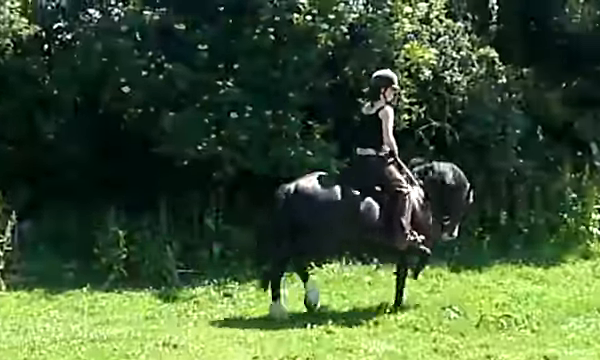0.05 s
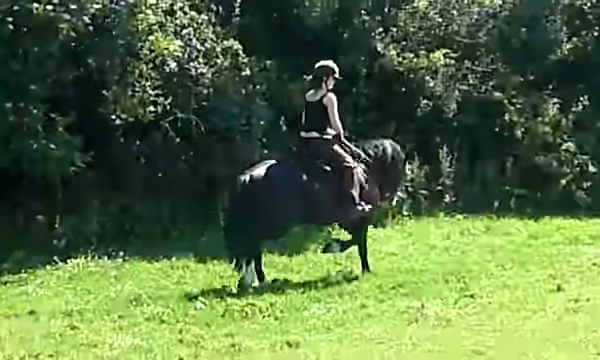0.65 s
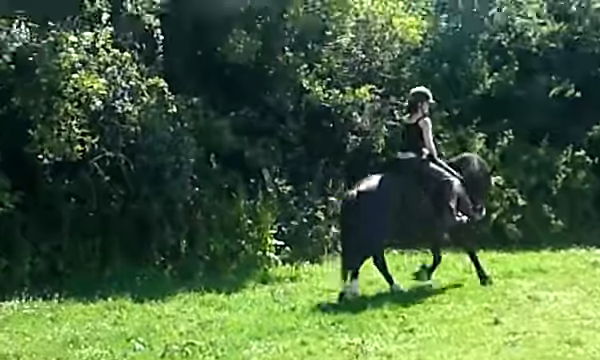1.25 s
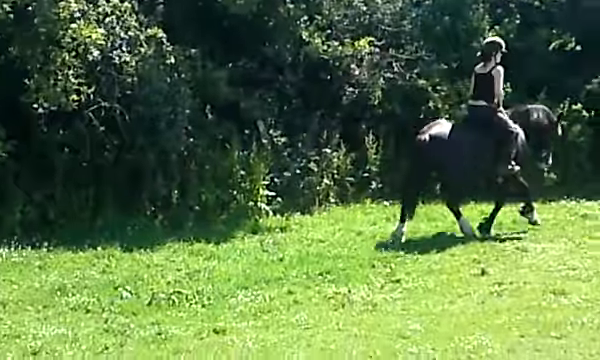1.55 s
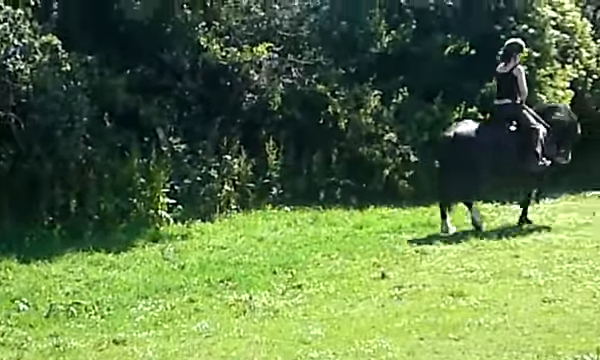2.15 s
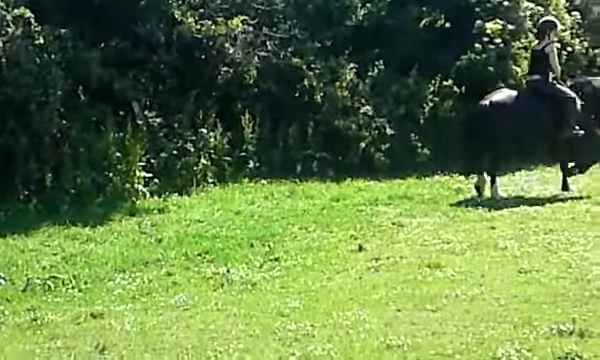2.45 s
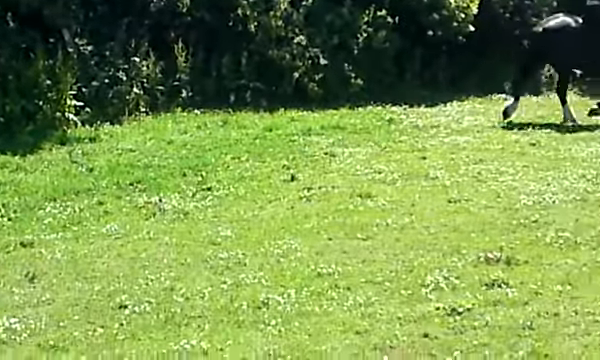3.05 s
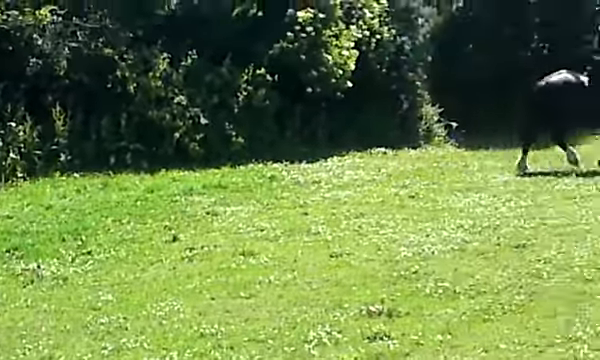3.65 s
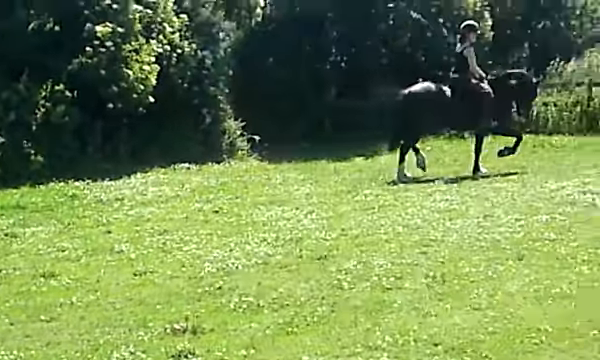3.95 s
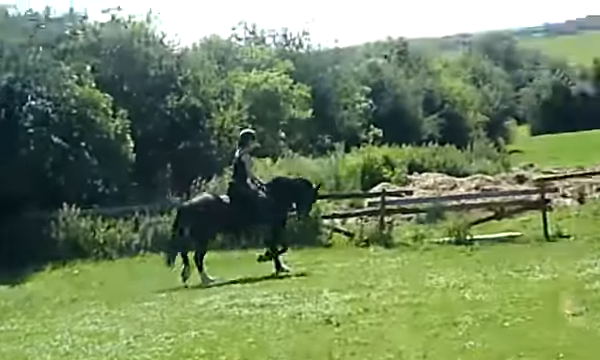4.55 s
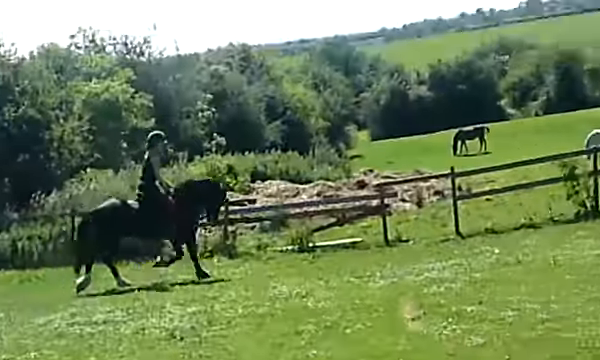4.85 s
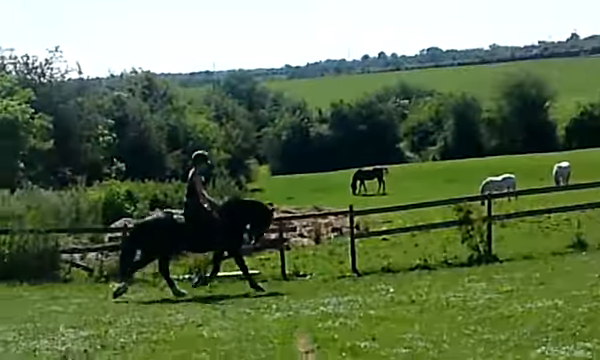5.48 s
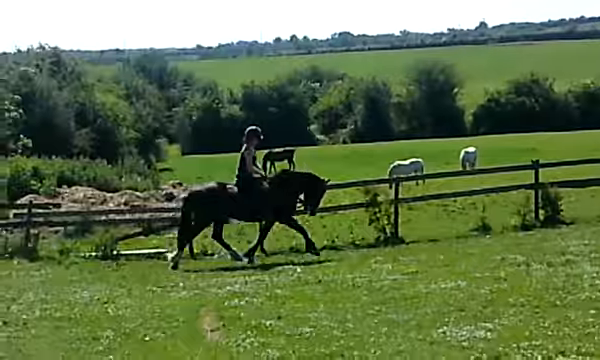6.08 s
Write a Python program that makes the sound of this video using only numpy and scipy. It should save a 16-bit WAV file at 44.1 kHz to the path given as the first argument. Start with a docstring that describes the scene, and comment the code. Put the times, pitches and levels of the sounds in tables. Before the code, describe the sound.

In a quiet open field, a horse trots some way off, its hooves thudding softly on turf while the tack clinks and it blows faintly. A loud cluster of clicks and scrapes from fingers on the camera comes early, right at the microphone. Small birds then trill and chirp in the hedge, and a second run of handling clicks follows. A soft breeze and a faint distant engine hum continue underneath.

```python
"""A breeze hisses in a quiet field, tack clinks, and a horse trots some way off, blowing softly.
Each hoof strikes soft turf, which damps the impact to a dull thud. Fingers shift on a camera and
excite the resonances of its case: it clicks, scrapes and rings, much louder than the field.
Small birds whistle in the hedge, scattered by the branches, over a distant engine's hum and faint
far-off whines. An insect buzzes once, early on; later a thin high hiss lingers after the birdsong."""
import sys
import numpy as np
from scipy import signal
from scipy.fft import rfft, irfft, next_fast_len
from scipy.io import wavfile
from scipy.ndimage import map_coordinates

SR = 44100
rng = np.random.default_rng(int(sys.argv[2]) if len(sys.argv) > 2 else 0)


def materialize(psi):
    """Save the field psi as 16-bit PCM at rate SR to the path in sys.argv[1].

    A 1-D psi becomes a single channel; in a 2-D psi each row is a channel.
    """
    bounded = np.clip(np.atleast_2d(psi).T, -1, 1)
    quanta = np.round(bounded * 32767).astype(np.int16)
    wavfile.write(sys.argv[1], SR, quanta)


N = 278712


def hoofs():
    """Damped impact: each hoof sets the turf briefly vibrating and crumbles the soil."""
    # hoof falls: t/s, level/dB
    steps = [(.286, -49), (.612, -60), (.955, -46.5), (1.311, -54), (1.655, -54), (1.972, -53),
             (2.361, -59), (2.72, -57), (3.085, -49.5), (3.47, -48), (3.815, -49.5), (4.463, -51),
             (4.664, -42), (4.949, -50), (5.882, -54), (6.217, -56)]
    turf_hz, pitch_spread, t60_s, soil_gain = 204, .1, .041, .75
    out, t = np.zeros(N), seconds(.25)
    soil = noise([(40, -7), (180, -1), (350, -4), (900, -20), (4000, -41)])  # f/Hz, level/dB
    for s, db in steps:
        hz = turf_hz * np.exp(pitch_spread * rng.standard_normal())
        crumble = np.roll(soil, -round(s * SR))[:len(t)]
        thud = .7 * np.sin(2 * np.pi * hz * t) + soil_gain * crumble
        add(out, s, amp(db) * struck(t, t60_s, rise_s=.00076) * thud)
    return out


def tack():
    """Free decay: clinking tack and swishing grass give bright noise that dies away exponentially."""
    # clinks and swishes: t/s, level/dB, T60/s, low cutoff f/Hz
    clinks = [(.224, -50, 0.38, 4530), (.395, -47, .07, 4000), (.527, -40.5, .08, 4550),
              (.591, -45.5, 0.21, 4500), (.76, -47.5, .27, 4500), (1.07, -46, .057, 5000),
              (1.26, -34.5, .025, 5030), (1.895, -41.5, .05, 6550), (3.255, -40, 0.033, 2800),
              (3.308, -46.5, 0.075, 4000), (3.478, -51, .018, 5000)]
    # spectrum of the jingle: f/Hz, relative level/dB
    spectrum = [(1500, -10), (3500, 0.5), (5000, -7), (7000, 4), (8500, -4.5)]
    out, t, jingle = np.zeros(N), seconds(.25), noise(spectrum)
    for s, db, t60, low_hz in clinks:
        burst = np.roll(jingle, -round(s * SR))[:len(t)]
        shimmer = filtered(burst, lambda f: f ** 3 / (f ** 3 + low_hz ** 3))
        add(out, s, amp(db) * struck(t, t60, rise_s=.0006) * unit(shimmer))
    return out


def blowing():
    """Turbulent flow: puffs through the horse's nostrils are coloured by the airway's resonance."""
    # breaths: t/s, duration/s, level/dB, resonance f/Hz
    blows = [(1.744, 0.097, -57, 1230), (2.848, 0.098, -58.5, 1300), (3.94, .075, -65, 1894),
             (4.957, .11, -64.5, 1916)]
    out = np.zeros(N)
    for s, length, db, hz in blows:
        u = seconds(length) / length
        airway = lambda f: 1 / (1 + 1.9j * (f / hz - hz / (f + 1))) ** 2
        breath = unit(filtered(rng.standard_normal(len(u)), airway))
        add(out, s, amp(db) * arch(u) * breath)
    return out


def case_clicks():
    """Impulse response: sharp contacts chatter on the camera case, whose flexing shell pushes air."""
    # contacts: t/s, level/dB, low cutoff f/Hz, high cutoff f/Hz, relative level of the push/dB
    contacts = [(0.5927, -29, 400, 6560, -30), (1.4869, -18, 2550, 2200, -38),
                (1.489, -1.5, 500, 1900, -20.5), (1.5096, -4, 3000, 4200, -20),
                (1.5133, -0.2, 2600, 3300, -26), (1.5145, -6, 3200, 2700, -34),
                (1.524, -14, 1900, 3400, -31), (1.5253, -4, 4200, 2400, -30),
                (1.5443, -14.5, 4200, 2600, -34), (4.4349, -40.5, 2000, 5961, -35),
                (4.5071, -11, 7900, 14000, -29.5), (4.5714, -22.5, 600, 2730, -33),
                (4.6349, -12, 2800, 9000, -27), (4.6365, -13.5, 500, 1780, -34),
                (4.6418, -18.5, 1300, 2200, -40), (4.6435, -24, 600, 910, -32),
                (4.7199, -29, 2500, 1900, -7)]
    chatter_per_hz, chatter_t60_s = .00004, .0042  # harder, brighter contacts chatter more
    push_hz, push_decay_s = 120, .0019
    out, t = np.zeros(N), seconds(.04)
    push = np.exp(-t / push_decay_s) * np.cos(2 * np.pi * push_hz * t) * (1 - np.exp(-t / .0001))
    for s, db, low_hz, high_hz, push_db in contacts:
        chatter = chatter_per_hz * high_hz * rng.standard_normal(len(t)) * amp(-60 * t / chatter_t60_s)
        click = through_case((t == 0) + chatter, low_hz, high_hz)
        add(out, s, amp(db) * (click / np.abs(click).max() - amp(push_db) * push))
    return out


def case_rubs():
    """Stick-slip friction: sliding skin drives the case with tiny uneven slips that carry no bass."""
    # slides: t/s, duration/s, level/dB, low cutoff f/Hz, high cutoff f/Hz
    rubs = [(1.468, .077, -44.5, 1400, 4000), (1.49, .018, -32, 1000, 5500),
            (1.513, .02, -26.5, 1800, 3800), (1.534, .008, -37, 3000, 3000),
            (4.286, .076, -39.5, 1300, 2650), (4.622, 0.036, -45, 900, 2800)]
    grain_db, bass_cut_hz = 6.5, 310
    out = np.zeros(N)
    for s, length, db, low_hz, high_hz in rubs:
        u = seconds(length) / length
        slips = rng.standard_normal(len(u)) * amp(grain_db * rng.standard_normal(len(u)))
        force = filtered(slips, lambda f: f ** 4 / (f ** 4 + bass_cut_hz ** 4))
        add(out, s, amp(db) * arch(u, .55) * unit(through_case(force, low_hz, high_hz)))
    return out


def case_rings():
    """Free vibration: small parts of the camera ring on after a click as damped sinusoids."""
    # ringing parts: t/s, f/Hz, level/dB, T60/s
    rings = [(.5928, 990, -37, 0.017), (1.5127, 1570, -13, .022), (1.5446, 3000, -24, 0.013),
             (4.5068, 3090, -29, .016), (4.636, 634, -46.5, 0.54), (4.6419, 2440, -29, 0.015),
             (4.7199, 764.6, -13, 0.012)]
    out, t = np.zeros(N), seconds(.5)
    for s, hz, db, t60 in rings:
        add(out, s, amp(db) * struck(t, t60, rise_s=.00067) * np.sin(2 * np.pi * hz * t))
    return out


def through_case(force, low_hz, high_hz):
    """Modal superposition: a force drives the case; soft contacts lose treble, small ones lose bass."""
    # modes of the plastic case: f/Hz, bandwidth/Hz, level/dB
    modes = [(190, 236, -2), (764, 410, 0.5), (1500, 620, -2), (2340, 620, -2.5), (3000, 485, -1),
             (4100, 1440, -6.5), (6250, 2000, -5.5), (7700, 1100, -2.5)]

    def response(f):
        body = sum((-1) ** k * amp(db) * 1j * f * width / (hz * hz - f * f + 1j * f * width)
                   for k, (hz, width, db) in enumerate(modes))
        high_pass = 1j * f / (low_hz + 1j * f)
        low_pass = 1 / (1 + 1j * np.sqrt(2) * f / high_hz - (f / high_hz) ** 2)
        return body * high_pass * low_pass
    return filtered(force, response)


def birds():
    """Direct and scattered sound: the song arrives both straight and by way of the trees."""
    # gliding chirps: t/s, duration/s, start f/Hz, end f/Hz, level/dB
    chirps = [(0.747, 0.038, 5000, 4200, -61), (1.825, .055, 5100, 4230, -59),
              (3.387, .099, 6190, 5440, -57), (4.306, 0.039, 7700, 5910, -49.5),
              (4.427, .02, 3800, 4500, -55), (4.429, 0.054, 3400, 2850, -56.5),
              (4.483, .026, 5590, 6900, -49), (4.76, 0.032, 4400, 3650, -56.5),
              (4.795, 0.034, 3380, 3060, -55.5), (4.827, .046, 5040, 3970, -51.5),
              (5.913, 0.052, 3200, 2860, -63), (6.175, .036, 4450, 3650, -58.5),
              (6.207, .038, 3440, 3090, -60)]
    # held whistles: t/s, duration/s, f/Hz, level/dB
    whistles = [(2.096, .077, 6900, -62.5), (4.348, 0.043, 6910, -55.5), (4.493, 0.1, 6820, -48),
                (4.76, 0.076, 5180, -51), (5.52, .048, 5860, -54), (5.55, .065, 6180, -58.5),
                (5.625, .09, 4100, -56), (6.24, 0.053, 4430, -62.5)]
    pitch_sag, scatter_db = .014, -5
    song = trill(count=7) + forked_calls(count=3)
    for s, length, start_hz, end_hz, db in chirps:
        add(song, s, amp(db) * chirp(length, start_hz, end_hz))
    for s, length, hz, db in whistles:
        add(song, s, amp(db) * whistle(length, hz, hz, (1 - pitch_sag) * hz))
    return .8 * song + amp(scatter_db) * trees(song)


def trill(count):
    """Periodic repetition: falling sweeps grow louder, each opened by a soft, short note."""
    # one sweep: duration/s, start f/Hz, middle f/Hz, end f/Hz
    glide = (.046, 6000, 4600, 3800)
    start_s, period_s, first_db, growth_db = 3.525, .1128, -57, 1.16
    opening_lead_s, opening_db = .02, -13
    out = np.zeros(N)
    for k in range(count):
        s, db = start_s + k * period_s, first_db + k * growth_db
        sweep = whistle(*glide)
        swell = np.minimum(1, np.linspace(.3, 2, len(sweep)))
        add(out, s, amp(db) * swell * sweep)
        add(out, s - opening_lead_s, amp(db + opening_db) * whistle(.031, 5650, 5750, 5650))
    return out


def forked_calls(count):
    """Biphonation: in each thin, high call one voice falls while the other rises."""
    # the two voices: start f/Hz, middle f/Hz, end f/Hz, level/dB
    voices = [(7960, 7720, 7350, -65.5), (8080, 8260, 8490, -69.5)]
    start_s, period_s, length_s = 2.645, .22, .088
    out = np.zeros(N)
    for k in range(count):
        for start_hz, middle_hz, end_hz, db in voices:
            add(out, start_s + k * period_s, amp(db) * whistle(length_s, start_hz, middle_hz, end_hz))
    return out


def far_chirps(count):
    """Diffuse sound: faint falling chirps, at random moments, arrive only through the trees."""
    out = np.zeros(N)
    for when, pitch, strength in rng.random((count, 3)):
        hz = 3000 + 2000 * pitch
        add(out, when * N / SR, amp(-71.5 + 4 * strength) * chirp(.045, hz, .82 * hz))
    return trees(out)


def chirp(length, start_hz, end_hz, bow=.0149):
    """Frequency sweep: a glide between two pitches whose middle bows slightly upward."""
    return whistle(length, start_hz, (1 + bow) * (start_hz + end_hz) / 2, end_hz)


def whistle(length, start_hz, middle_hz, end_hz):
    """Frequency and amplitude modulation: a tone glides unsteadily through three pitches."""
    quaver_depth, flutter_db, knots_per_s = .0089, 3, 250
    u = seconds(length) / length
    glide_hz = np.polyval(np.polyfit([0, .5, 1], [start_hz, middle_hz, end_hz], 2), u)
    knots = u * length * knots_per_s
    quaver, flutter = [map_coordinates(rng.standard_normal(64), [knots]) for _ in range(2)]
    tone = np.sin(phase(glide_hz * (1 + quaver_depth * quaver)))
    return arch(u, .56) * amp(flutter_db * flutter) * tone


def trees(song):
    """Reverberation by scattering: near branches blur each note, the far hedge leaves a faint tail."""
    branch_t60_s, hedge_t60_s, hedge_db = .077, 1.2, -14.5
    t = seconds(.7)
    decay = amp(-60 * t / branch_t60_s) + amp(hedge_db - 60 * t / hedge_t60_s)
    tail = decay * rng.standard_normal(len(t))
    return signal.fftconvolve(song, tail / np.linalg.norm(tail))[:N]


def buzz_and_hiss():
    """Narrow-band noise: an insect's buzz near 1 s, then a thin high hiss lingering after birdsong."""
    # swells of the band: t/s, time until release/s, level/dB
    swells = [(.97, 0.54, -63), (3.55, 0.83, -69.5), (4.98, .5, -73.5)]
    # spectrum of the band: f/Hz, relative level/dB
    spectrum = [(4500, -39.5), (4950, -11.5), (5220, -3.5), (5600, -3.5), (6200, -14), (7500, -35)]
    attack_s, release_s = .1, .2
    t = np.arange(N) / SR
    envelope = sum(amp(db) * np.interp(t - s, [0, attack_s, length, length + release_s], [0, 1, 1, 0])
                   for s, length, db in swells)
    return envelope * amp(2 * wobble(90)) * noise(spectrum)


def breeze():
    """Broadband noise of moving air: a low rumble, a distant wash and hissing leaves, all wavering."""
    # spectra of the three bands: f/Hz, relative level/dB
    rumble_spectrum = [(12, -24), (20, -12.5), (49, 0), (118, -6.5), (145, -3.5), (167, -9.5), (321, -10.5),
                       (450, -14), (580, -42.5), (990, -120)]
    wash_spectrum = [(180, -48), (300, -12.5), (523, -5.5), (649, -4), (734, -2.5), (813, -1), (1170, -2.5),
                     (1780, -10.5), (1990, -9), (2730, -12), (3500, -11.5), (4550, -17), (7700, -120)]
    leaf_spectrum = [(1650, -49.5), (2800, -28.5), (3310, -20.5), (4080, -5), (5270, -2), (5970, -2),
                     (7390, -2), (8040, -8.5), (8500, -9), (11000, -45.5), (18700, -120)]
    # envelopes of the wash and the leaves: t/s, level/dB
    wash_levels = [(0, -62.5), (1.0, -61), (2.2, -63), (3.7, -61.5), (5.2, -61.5), (6.32, -63)]
    leaf_levels = [(0, -61), (.13, -64), (.25, -60), (1.48, -59), (1.66, -62.5), (2.3, -65.8), (5.7, -65),
                   (6.32, -67.5)]
    rumble = amp(-70 + 1.205 * wobble(7)) * noise(rumble_spectrum)
    wash = amp(curve(wash_levels) + .2 * wobble(1.3) + .75 * wobble(7.7)) * noise(wash_spectrum)
    leaves = amp(curve(leaf_levels) + .77 * wobble(14)) * noise(leaf_spectrum)
    return rumble + wash + leaves


def engine():
    """Periodic source: the hum of a far engine sinks in pitch as it slowly runs down."""
    # envelope of the hum: t/s, level/dB
    levels = [(0, -69), (1.3, -67.5), (2.0, -75), (4.0, -73), (6.3, -77.5)]
    start_hz, sag_hz_per_s = 103, 1.5
    hz = start_hz - sag_hz_per_s * np.arange(N) / SR + .804 * wobble(2.7)
    return amp(curve(levels) + wobble(5.3)) * np.sin(phase(hz))


def far_whines():
    """Spectral broadening: a long path through moving air smears each faint whine into a narrow band."""
    # whines: t/s, duration/s, start f/Hz, end f/Hz, level/dB
    whines = [(1.951, 0.19, 640, 670, -70), (2.519, 0.19, 780, 740, -67.5), (3.46, .23, 880, 1200, -66),
              (4.08, .17, 1300, 1078, -69)]
    out = np.zeros(N)
    for s, length, start_hz, end_hz, db in whines:
        u = seconds(length) / length
        smear = (wobble(90) + 1j * wobble(90))[:len(u)]
        tone = np.exp(1j * phase(start_hz + (end_hz - start_hz) * u))
        add(out, s, amp(db) * arch(u, .5) * unit(np.real(smear * tone)))
    return out


def amp(db):
    """Decibels to amplitude ratio."""
    return 10 ** (np.asarray(db) / 20)


def unit(x):
    """Normalisation to rms 1."""
    return x / np.sqrt(np.mean(x ** 2) + 1e-20)


def seconds(length):
    """A sampled time axis."""
    return np.arange(int(length * SR)) / SR


def phase(hz):
    """Phase as the integral of frequency."""
    return 2 * np.pi * np.cumsum(hz) / SR


def struck(t, t60, rise_s):
    """Exponential decay with a quick rise."""
    return amp(-60 * t / t60) * (1 - np.exp(-t / rise_s))


def arch(u, power=1):
    """Half-sine envelope over u = 0 to 1; a lower power flattens it."""
    return np.abs(np.sin(np.pi * u)) ** power


def curve(points):
    """Linear interpolation of (t/s, value) points."""
    return np.interp(np.arange(N) / SR, *np.transpose(points))


def wobble(rate):
    """Smooth random modulation, rate knots a second."""
    knots = rng.standard_normal(int(N * rate / SR) + 4)
    return map_coordinates(knots, [np.arange(N) * rate / SR])


def add(track, s, sound):
    """Superpose a sound on a track at time s."""
    part = track[max(round(s * SR), 0):][:len(sound)]
    part += sound[:len(part)]


def filtered(x, response):
    """Linear filtering: the spectrum of x times a frequency response."""
    size = next_fast_len(len(x) + SR // 10)
    return irfft(rfft(x, size) * response(np.fft.rfftfreq(size, 1 / SR)), size)[:len(x)]


def noise(spectrum):
    """Noise of rms 1 coloured by (f/Hz, level/dB) points."""
    f, db = np.transpose(spectrum)
    colour = lambda hz: amp(np.interp(np.log(hz + 1), np.log(f), db))
    return unit(filtered(rng.standard_normal(N), colour))


def scene():
    """Superposition: the field, the horse, the birds and the hand on the camera add in one channel."""
    field = breeze() + engine() + far_whines() + buzz_and_hiss()
    horse = hoofs() + tack() + blowing()
    song = birds() + far_chirps(count=14)
    handling = case_clicks() + case_rubs() + case_rings()
    return (field + horse + song + handling)[None]


def record(dry):
    """Band limiting and saturation: a narrow-band microphone channel clips on the hardest clicks."""
    cutoff_hz, ceiling, top_hz = 8200, .72, 16300
    heard = filtered(dry[0], lambda hz: 1 / np.sqrt(1 + (hz / cutoff_hz) ** 56))
    clipped = np.clip(heard, -ceiling, ceiling)
    return filtered(clipped, lambda hz: np.clip((top_hz - hz) / 700, 0, 1))[None]


dry = scene()
out = record(dry)
materialize(out)
```